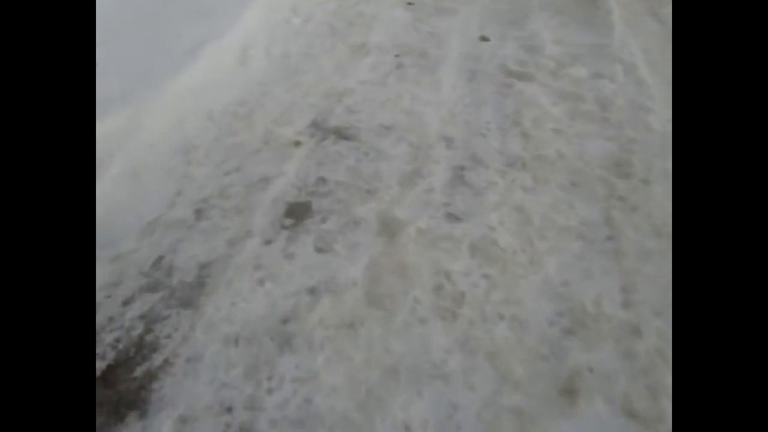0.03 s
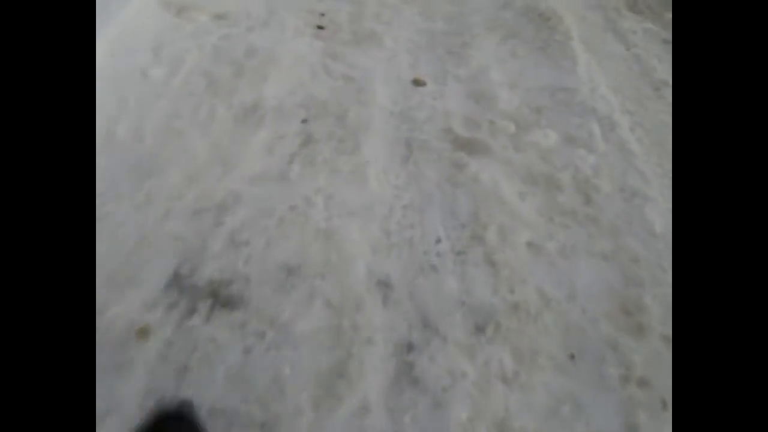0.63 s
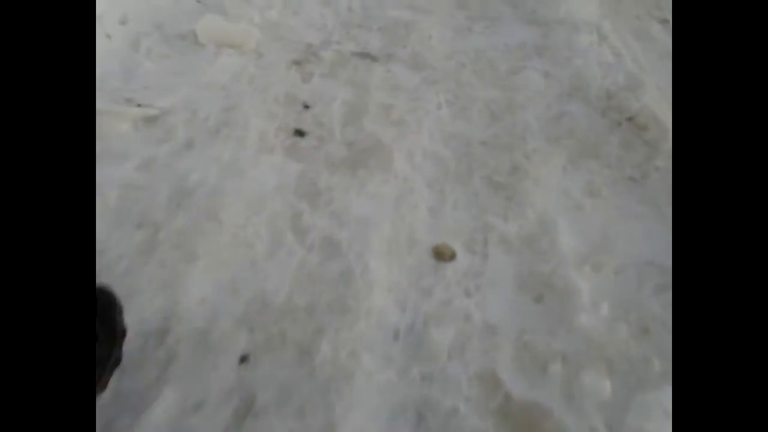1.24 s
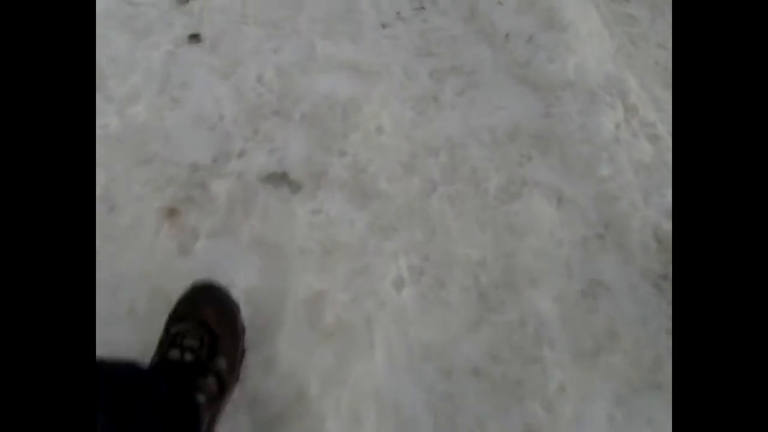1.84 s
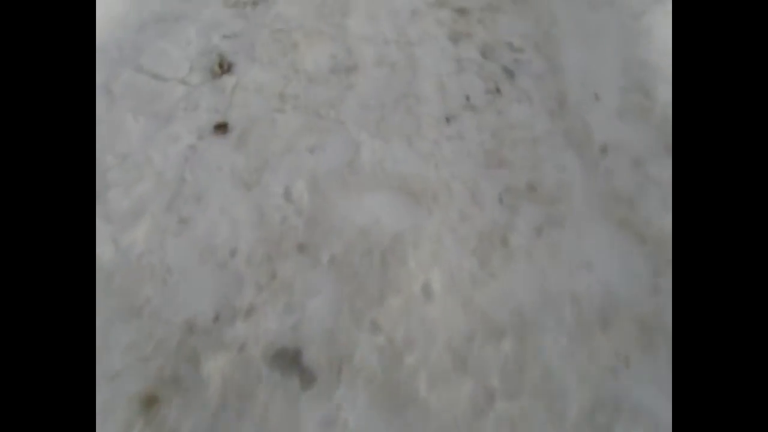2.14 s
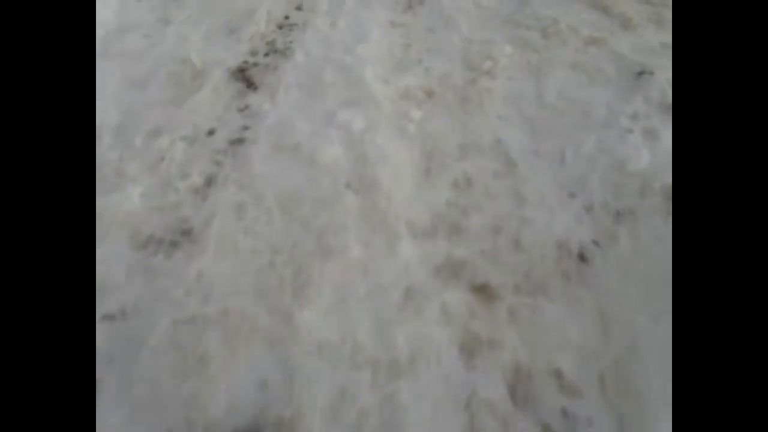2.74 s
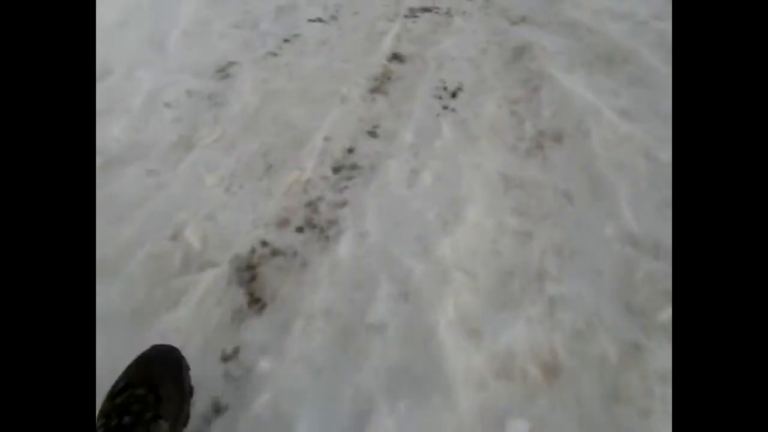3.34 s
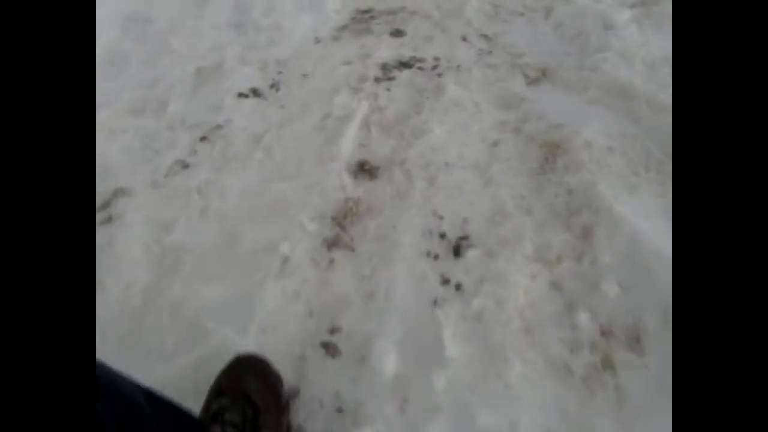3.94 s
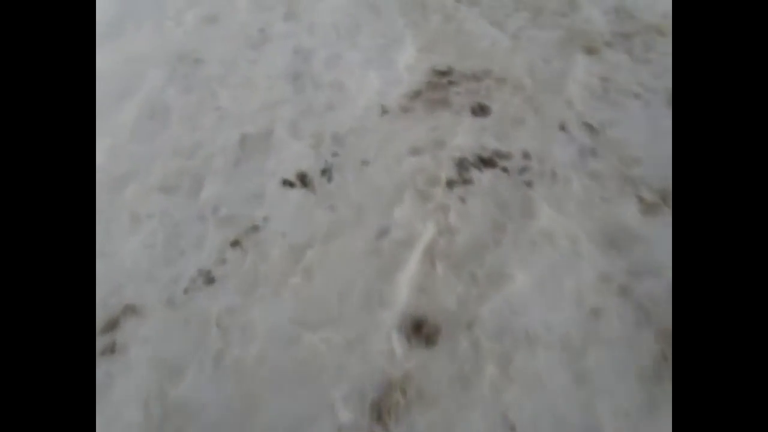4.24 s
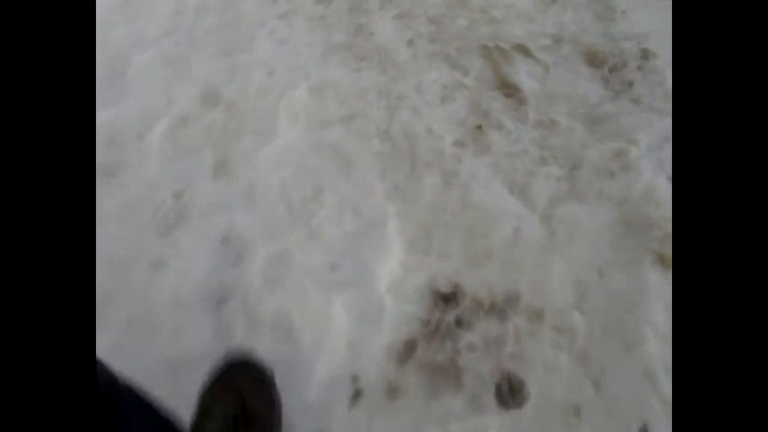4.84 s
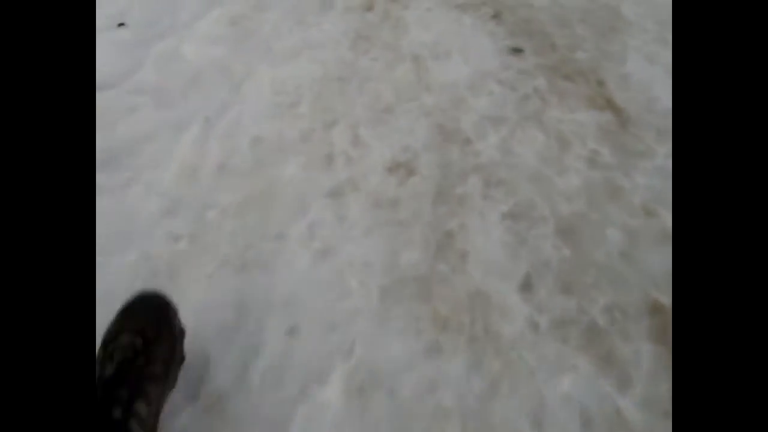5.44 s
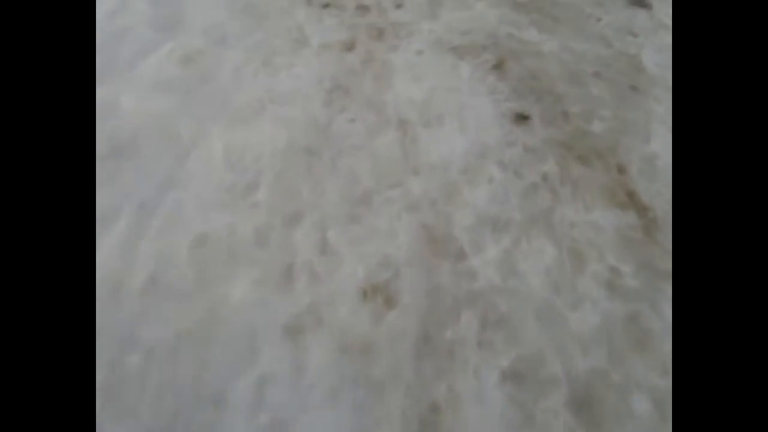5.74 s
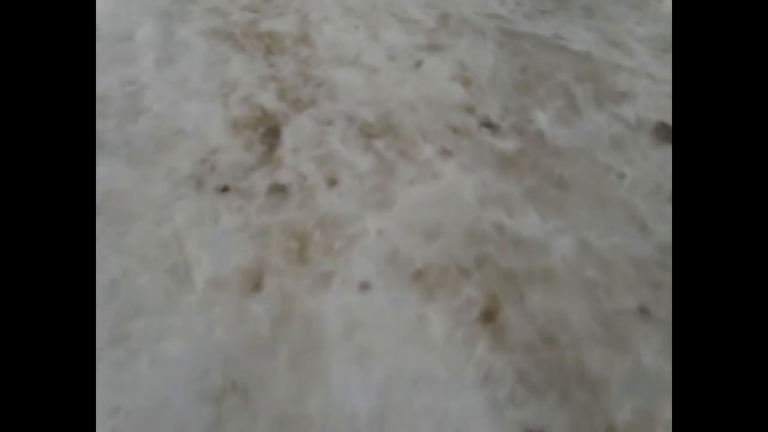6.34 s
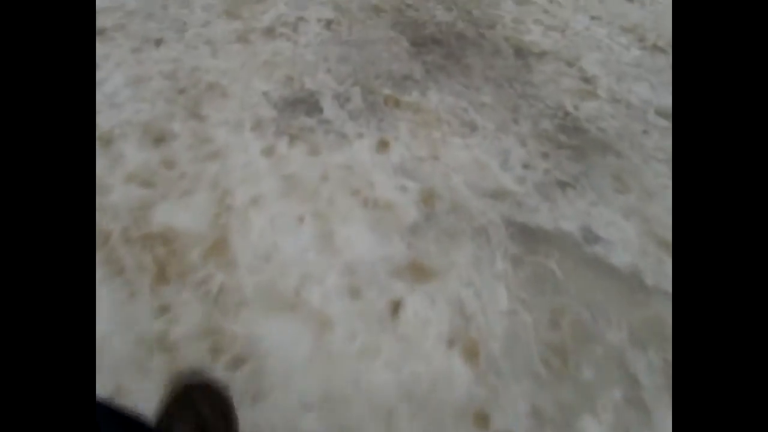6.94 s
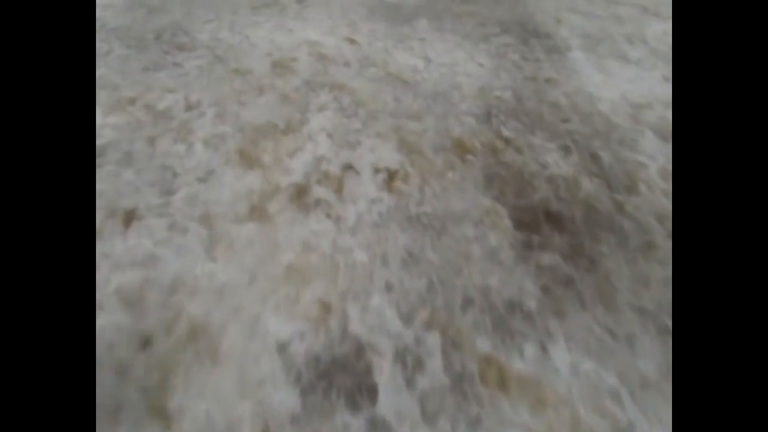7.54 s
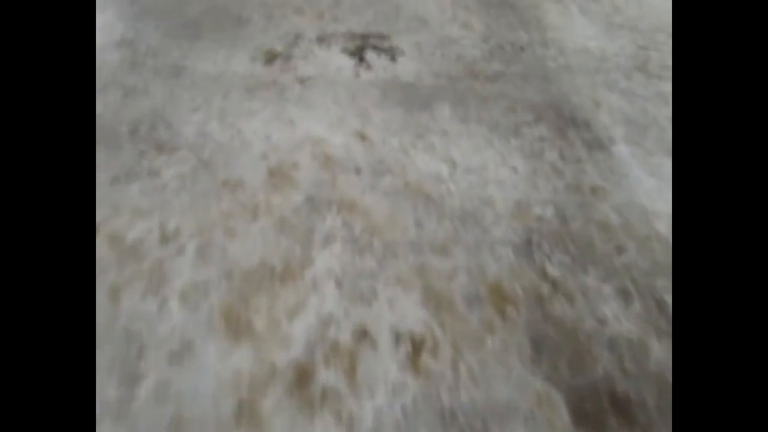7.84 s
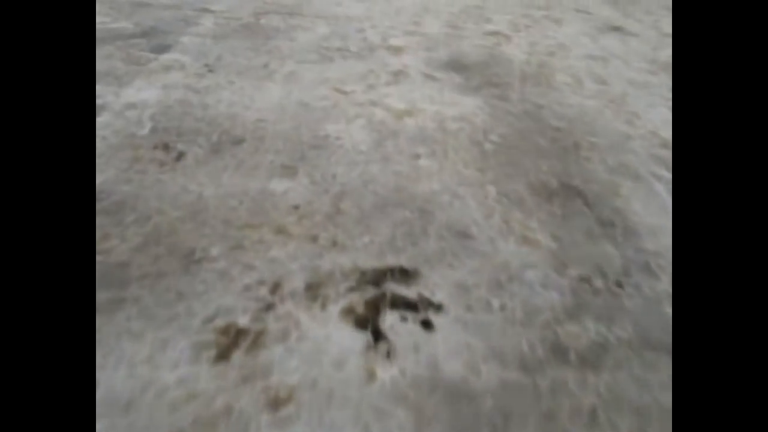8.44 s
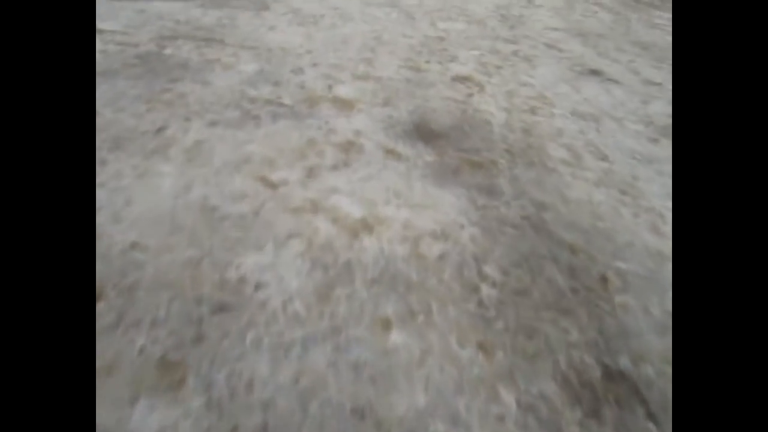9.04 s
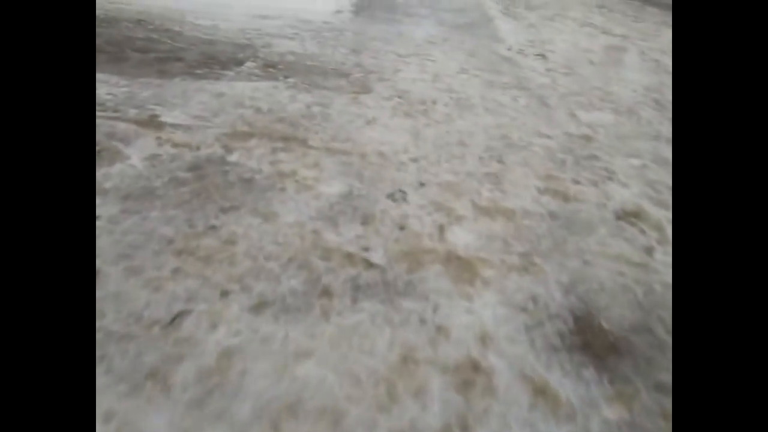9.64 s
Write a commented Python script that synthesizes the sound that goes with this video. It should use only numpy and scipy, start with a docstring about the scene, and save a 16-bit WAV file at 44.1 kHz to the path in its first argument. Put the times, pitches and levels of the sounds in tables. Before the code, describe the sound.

Boots crunch over crusted ice and packed snow at about two steps a second, heard close from a microphone the walker carries. Each step is a dense burst of tiny fractures with a bright fizz of crystals, loose ticks and single sharp cracks. Soles scuff between steps, and one slides with a brief, ringing scrape at 4.5 seconds. From about 5 seconds, wind buffets the microphone in uneven puffs, strongest around 6 seconds and again just before 8. After about 7 seconds the steps become lighter and sparser in texture, as on harder ice, with one loud crack at 8.5 seconds and a thin, high crackle. A few soft, low thuds reach the microphone along the way. A faint outdoor hush lies underneath throughout, and one short, raspy, distant squawk sounds at about 9.6 seconds.

```python
"""Boots crunch over crusted ice and packed snow, about two steps a second.
Each step breaks the crust: a dense crunch of tiny fractures, a fizz of crystals, loose ticks and
single sharp cracks. Now and then a sole slides and the ice sings. The walker points a camera down at
the boots; air buffets its two microphone openings (ports), mostly in the second half, and soft, low
thuds reach it. A faint outdoor hush lies below, with one far squawk near the end."""
import sys
import numpy as np
from scipy import signal
from scipy.fft import rfft, irfft, next_fast_len
from scipy.io import wavfile
from scipy.ndimage import uniform_filter1d

SR = 44100
rng = np.random.default_rng(int(sys.argv[2]) if len(sys.argv) > 2 else 0)


def digitize_waveform(pressure):
    """Quantize a signal to 16-bit integers and store it at the path in sys.argv[1].

    Rows of a 2-D input are taken as channels; values are limited to [-1, 1].
    """
    field = np.atleast_2d(pressure).T
    bounded = np.clip(field, -1, 1)
    quanta = np.round(bounded * 32767).astype(np.int16)
    wavfile.write(sys.argv[1], SR, quanta)


N = 426888

# A boot takes the weight. Each row: start in seconds, hold in seconds, crunch in dB,
# ice hardness in dB (more is brighter), crystal fizz in dB.
FOOTFALLS = [(0.267, 0.026, -25.5, 1.5, -33), (0.828, 0.05, -27.5, 1.5, -41.5),
             (1.368, 0.038, -27.5, -1, -34), (1.878, 0.069, -36, 23, -40), (2.403, 0.049, -30.5, 5, -34.5),
             (2.933, 0.027, -28, 0.5, -35), (3.385, 0.095, -26.5, 3, -37), (3.849, 0.14, -28.5, 9.5, -36.5),
             (4.442, 0.094, -32, 4.5, -38), (5.026, 0.054, -31.5, 2, -35.5), (5.343, 0.27, -33, 1, -50.5),
             (6.052, 0.028, -28.5, 5, -29.5), (6.606, 0.021, -30.5, -4, -49.5),
             (7.069, 0.041, -41, 9.5, -43.5), (7.63, 0.075, -38, 2, -48), (8.146, 0.031, -33.5, 3, -42.5),
             (8.626, 0.013, -41.5, 16, -48), (9.178, 0.035, -43, 40, -50)]
# The sole rolls off or drags. Each row: middle in seconds, half length in seconds, crunch in dB,
# ice hardness in dB, crystal fizz in dB.
SCUFFS = [(0.211, 0.038, -46, 19, -53.5), (0.783, 0.075, -42.5, 34, -61.5), (1.125, 0.093, -32, 5, -52),
          (1.773, 0.03, -43, 25, -56), (2.094, 0.095, -50.5, 16, -49.5), (2.302, 0.069, -38, 11.5, -56.5),
          (2.508, 0.014, -33, 4, -42.5), (2.872, 0.032, -37, 17, -47.5), (3.05, 0.08, -44.5, 16, -42.5),
          (3.31, 0.12, -38, 5, -46.5), (3.972, 0.026, -47, -1, -48), (4.1, 0.067, -47.5, 9, -46.5),
          (4.328, 0.041, -37, -5.5, -49.5), (4.399, 0.0081, -22, 7.5, -29.5), (4.956, 0.12, -43, 9, -56.5),
          (5.2, 0.12, -41.5, -11, -50.5), (5.652, 0.022, -39, 8.5, -47), (5.933, 0.22, -44, 14, -47),
          (6.369, 0.007, -29.5, 2, -43.5), (6.488, 0.0083, -42.5, 0, -57), (7.185, 0.012, -32, -1, -50.5),
          (7.53, 0.024, -42, 24, -52), (8.714, 0.021, -49, 28, -54)]
# Snow rustles under the standing boot. Each row: time in seconds, crunch in dB, crystal fizz in dB.
RUSTLE = [(0, -49, -57), (.52, -60, -67.5), (0.798, -50, -58), (1.6, -52.5, -54.5), (2.7, -43.5, -56.5),
          (4.7, -48, -59), (6.1, -52, -56), (6.9, -49, -65), (8.902, -62.5, -55), (9.68, -44, -62)]
# The tone of the crunch and of the fizz. Each row: frequency in Hz, level in dB.
CRUNCH_COLOUR = [(120, -75.5), (200, -15), (400, -9.5), (520, -5), (750, 2.5), (1000, -0.5), (1400, -5.5),
                 (1700, -3), (2300, -7.5), (3200, -11.5), (3900, -25.5), (6000, -16), (12000, -100)]
FIZZ_COLOUR = [(2000, -21), (3300, -1.5), (4100, -4.5), (5300, 3), (6500, 1), (8300, -1), (10000, -6.5),
               (12000, -12.5), (14000, -30), (16000, -80)]
# Single cracks of the crust. Each row: time in seconds, level in dB, pitch in Hz,
# width of the ring in octaves (3 at most is used), bright snap in dB.
CRACKS = [(0.2426, -28, 990, 1.8, -32), (0.2734, -23, 990, 0.79, -58), (0.3179, -15.5, 1000, 0.95, -32.5),
          (0.3415, -24, 1060, 1.15, -43), (0.3913, -29.5, 990, 0.97, -49), (0.3976, -13, 1120, 0.92, -35),
          (0.5596, -38, 1710, 0.74, -49.5), (0.6266, -21, 1280, 1.13, -49.5),
          (0.6411, -21, 1093, 1.16, -47), (0.6477, -27.5, 1110, 1.24, -59), (0.708, -29.5, 1380, 1.4, -48),
          (0.778, -27, 2140, 2.5, -47), (0.7929, -31, 1110, 2.9, -38), (0.8453, -19, 1120, 1.6, -31),
          (0.857, -17, 1720, 0.84, -28.5), (0.8772, -21, 1050, 1.12, -66), (0.9503, -35.0, 910, 1, -63),
          (0.9868, -32, 1030, 1.5, -65), (0.996, -24.5, 1200, 0.73, -57), (1.0777, -16, 1170, 1.03, -37),
          (1.1104, -24.5, 1150, 0.87, -49), (1.1286, -27, 1430, 0.61, -52), (1.172, -23.5, 1390, 0.66, -73),
          (1.1846, -25, 1550, 0.75, -56), (1.2083, -20.5, 1630, 0.92, -52), (1.2254, -24, 1610, 1.1, -47),
          (1.2547, -28.5, 1260, 2.2, -43), (1.3106, -24, 1260, 2.2, -40), (1.555, -33.5, 1000, 1.5, -40),
          (1.607, -30.5, 1350, 1.8, -42), (1.7071, -31, 1430, 2.1, -43), (1.7276, -32, 1310, 2.1, -43),
          (1.7552, -38, 1480, 3.8, -42.5), (1.8803, -28, 940, 1.25, -53), (2.0937, -24.5, 1320, 1.06, -26),
          (2.1375, -32.5, 940, 2.2, -42), (2.1856, -23.5, 1130, 1.04, -40.5), (2.2618, -30, 1190, 1.4, -49),
          (2.2959, -23, 1250, 1.2, -41), (2.3173, -18.5, 1170, 1.17, -36.5), (2.3368, -22, 1350, 1.1, -40),
          (2.3539, -26.5, 1490, 0.84, -39), (2.405, -23.5, 1030, 0.91, -29), (2.4156, -19.5, 840, 2.7, -30),
          (2.4416, -21, 780, 0.8, -44), (2.4599, -25.5, 840, 2.2, -36), (2.4705, -16.5, 1790, 1.7, -40),
          (2.5615, -19.5, 846, 0.84, -37), (2.6404, -21.5, 1140, 1.24, -47), (2.7149, -22.5, 970, 1.2, -48),
          (2.7884, -31, 1270, 2.6, -57), (2.8018, -30.5, 1095, 2.4, -38.5), (2.8465, -28.5, 1080, 1.5, -48),
          (2.857, -25, 1430, 2.3, -40.5), (3.0355, -22.5, 970, 1.43, -32.5), (3.0478, -25, 1080, 2.6, -56),
          (3.1935, -26, 1080, 1.9, -40), (3.2592, -21, 1140, 1.6, -38), (3.2945, -18.5, 1120, 1.36, -35),
          (3.3669, -17.5, 1040, 1.6, -29), (3.4032, -15.5, 750, 0.49, -42), (3.4195, -18, 920, 0.87, -40),
          (3.4551, -25, 1000, 1.7, -45), (3.5159, -18, 1130, 1.5, -38), (3.5348, -29, 1580, 0.92, -55),
          (3.5501, -14, 1050, 0.99, -42), (3.5876, -29, 1020, 0.62, -64), (3.6067, -19.5, 1060, 1.13, -62),
          (3.667, -34.5, 1015, 0.95, -62.5), (3.6998, -27, 1170, 1.6, -66), (3.7232, -21, 1020, 1.13, -55),
          (3.74, -25, 1000, 0.67, -60), (3.758, -25, 1250, 1.4, -65), (3.784, -32, 1540, 1.3, -63),
          (3.808, -21.5, 1430, 1.5, -58), (3.8164, -25, 1810, 1.4, -44), (3.839, -19.5, 1220, 1.9, -56),
          (3.86, -13.5, 2010, 0.78, -59), (3.8668, -19, 1930, 0.83, -27.5), (3.926, -18, 1040, 1.03, -39),
          (3.9386, -22, 1290, 1.03, -53), (3.9966, -23, 1440, 0.86, -33), (4.0674, -30, 1080, 0.7, -58),
          (4.091, -22, 820, 0.74, -44.5), (4.193, -21.5, 920, 1.17, -39.5), (4.23, -29, 1030, 1.4, -44.5),
          (4.2633, -22.5, 1120, 1.04, -45), (4.267, -16, 1050, 0.98, -28.5), (4.304, -20, 1030, 1.2, -46),
          (4.316, -17.5, 1270, 0.74, -43), (4.36, -22, 1210, 0.84, -46), (4.3934, -16, 1530, 0.65, -47),
          (4.4501, -19.5, 1470, 1.1, -37), (4.7978, -23, 870, 1, -52), (4.9275, -32, 1160, 1.9, -45),
          (4.9373, -28.5, 1200, 2.2, -40.5), (5.022, -25.5, 900, 1.17, -37),
          (5.0307, -24.5, 985, 1.5, -30.5), (5.0367, -21.5, 980, 1, -31), (5.0689, -19.0, 800, 0.78, -51),
          (5.0813, -23, 980, 1.2, -58), (5.193, -23.5, 910, 1.36, -42), (5.2518, -33.5, 1046, 1.27, -39),
          (5.3097, -24.5, 1090, 0.97, -39), (5.3623, -23, 1230, 0.91, -39.5), (5.3961, -29, 1020, 1.5, -45),
          (5.4114, -24.5, 840, 0.85, -41), (5.437, -20.5, 1030, 1.55, -35), (5.536, -20.5, 1040, 1.1, -44),
          (5.6437, -25.5, 1030, 2.1, -44), (5.6511, -25.5, 1360, 1.85, -40), (5.75, -30.5, 872, 0.53, -48),
          (5.8745, -23.5, 860, 1, -41), (6.0593, -21, 1250, 0.99, -25), (6.0825, -19, 870, 1.5, -64),
          (6.1104, -19, 860, 1.25, -41), (6.121, -21, 1003, 0.88, -35), (6.1508, -26, 960, 0.94, -39),
          (6.2179, -32, 1000, 0.97, -59), (6.351, -18.5, 974, 1, -42.5), (6.4282, -35.5, 1470, 1, -47),
          (6.4852, -31, 1460, 1.1, -48), (6.5142, -33.5, 1805, 0.66, -54), (6.542, -32, 1288, 1.4, -49),
          (6.633, -22.5, 1716, 1.8, -36.5), (6.7637, -31.5, 1044, 1.3, -53),
          (6.9931, -36.5, 1560, 2.1, -60), (7.033, -33, 1150, 1.14, -39.5), (7.1454, -31, 960, 1.15, -39.5),
          (7.169, -29, 840, 1.92, -42), (7.2017, -29, 1088, 1.24, -51), (7.2168, -29.5, 1120, 0.58, -43),
          (7.2586, -35, 1640, 0.98, -43), (7.3282, -32.5, 1100, 1.4, -40.5),
          (7.4946, -17.5, 1460, 0.73, -31.5), (7.5137, -28, 1160, 1.8, -40.5),
          (7.5748, -34.5, 1584, 1.8, -42), (7.6115, -19, 1400, 1.26, -37), (7.638, -24, 990, 2, -54),
          (7.648, -22.5, 701, 0.72, -56), (7.6937, -22, 1897, 0.83, -37), (7.7388, -32, 1197, 1.33, -63.5),
          (7.8, -29.5, 960, 0.71, -39), (7.8343, -28.5, 1080, 1.56, -43), (7.89, -21.5, 944, 1.7, -61),
          (7.8947, -26, 1180, 1.38, -63), (7.9562, -37.5, 1310, 1.3, -63), (8.0361, -37.5, 1700, 2.3, -51),
          (8.151, -21, 766, 0.8, -46), (8.1944, -27, 1510, 1.6, -55), (8.3714, -34, 987, 0.8, -49),
          (8.5164, -11, 1280, 1.15, -34), (8.5348, -31, 1450, 0.98, -56), (8.543, -39, 1310, 1.3, -57),
          (8.556, -37, 1800, 3.3, -65), (8.572, -40.5, 1996, 3, -59), (8.587, -36, 1720, 3.6, -59),
          (8.6053, -27.5, 1330, 1.8, -37.5), (8.623, -32, 1750, 0.74, -39), (8.635, -27.5, 1730, 0.79, -55),
          (8.6563, -31, 1390, 3.2, -39), (9.0454, -25.5, 1360, 0.59, -49), (9.045, -26.5, 2770, 0.64, -49),
          (9.2079, -26, 2000, 0.92, -41), (9.2245, -30.5, 1904, 0.51, -51), (9.4334, -34, 750, 1.23, -68),
          (9.531, -34.5, 1106, 2.9, -48)]
# Loose grains on the path, few on the bare ice at the end. Each row: time in seconds, tick gain in dB.
LOOSE_GRAINS = [(0.3, 0), (0.5, -18), (0.9, -7.5), (4.7, -5), (6.8, -6.5), (8.2, -3.5), (8.8, -17)]
# The sole slides. Each row: middle in seconds, half length in seconds, pitch in Hz,
# width in octaves, level in dB.
SLIDES = [(4.51, 0.02, 2000, 0.51, -25.5), (4.585, 0.012, 2130, 0.22, -42),
          (5.208, 0.058, 5150, 0.44, -48.5), (5.428, 0.055, 7400, 0.24, -47),
          (5.572, 0.073, 7540, 0.63, -43.5), (6.453, 0.037, 1774, 0.33, -44.5),
          (8.144, 0.0032, 7370, 0.13, -32)]
# Spells of moving air. Each row: start in seconds, hold in seconds, level in dB.
GUSTS = [(0.273, 0.034, -46.5), (2.842, 0.15, -50.5), (4.318, 0.03, -47), (5.199, 0.2, -43),
         (5.763, 0.42, -38.5), (6.499, 0.32, -47), (6.914, 0.24, -57.5), (7.16, 0.23, -46.5),
         (7.396, 0.52, -44), (8.098, 0.25, -43.5), (8.437, 0.099, -44), (8.685, 0.018, -48.5),
         (8.876, 0.046, -45.5), (9.122, .01, -50.5), (9.441, 0.021, -41.5), (9.527, 0.11, -45.5)]
# The strongest swirls of air to hit the ports. Each row: time in seconds, level in dB.
PUFFS = [(5.338, -26.5), (5.571, -33), (5.792, -29), (5.829, -30.5), (5.928, -21.5), (6.019, -22.5),
         (6.085, -22.5), (6.121, -15), (6.337, -36), (6.499, -29), (7.18, -32), (7.606, -29),
         (7.652, -21.5), (7.887, -18), (8.108, -31.5), (8.298, -34), (9.433, -29)]
# The tone of the wind before its speed shifts it. Each row: frequency in Hz, level in dB.
WIND_COLOUR = [(25, -35), (60, -35), (110, -11), (200, 0.5), (330, 5), (520, 5), (750, 2), (1100, -9),
               (2000, -22), (6000, -88)]
# Soft, low thuds and rumbles. Each row: middle in seconds, level in dB, half length in seconds.
LOW_THUDS = [(0.3, -66, 0.02), (1.952, -57, 0.034), (2.065, -55, 0.03), (2.448, -56, 0.027),
             (3.553, -50, 0.0067), (5.852, -61, 0.06), (6.127, -46, 0.01), (8.48, -57, 0.045),
             (8.52, -44, 0.005)]
# The course of the far squawk. Each row: time in seconds, pitch in Hz, level in dB.
SQUAWK = [(9.55, 1260, -75), (9.57, 1310, -51), (9.6, 1375, -48), (9.613, 1260, -47), (9.632, 1390, -43.5),
          (9.648, 1260, -48), (9.665, 1000, -70)]
# The squawk's harmonics (multiples of its pitch). Each entry: level in dB, lowest harmonic first.
SQUAWK_HARMONICS_DB = [0, -1.5, -15, -6, -21]
# The outdoor background. Each row: time in seconds, hush in dB, thin high crackle in dB.
HUSH_LEVELS = [(0, -54, -84), (6.2, -50, -75), (6.8, -56.5, -74.5), (8.3, -54, -66), (8.9, -57, -61.5),
               (9.35, -52.5, -67), (9.68, -49, -76.5)]
# The tone of the hush. Each row: frequency in Hz, level in dB.
HUSH_COLOUR = [(30, -14), (130, -36), (300, -22), (550, -9), (1060, 0), (2200, 3), (3100, -3.5),
               (4100, -11.5), (5500, -8), (8000, -15.5), (11500, -22), (14000, -24), (16000, -64)]
# How alike the hush is left and right. Each row: frequency in Hz, likeness (1 same, -1 or less opposite).
HUSH_LIKENESS = [(100, -0.49), (600, 0.74), (2500, 0.99), (6000, 0.21), (12000, -1.3)]
# The sharpest clicks of the high crackle. Each row: time in seconds, level in dB.
PINPRICKS = [(8.288, -29), (8.359, -27), (8.867, -26)]

LOAD_DB_PER_S, UNLOAD_DB_PER_S = 541, 346   # how fast a footfall rises and dies
BASE_GRAINS_PER_S = 1900   # scaled by the load and by the share of fine crystals
CRACK_LEAD_S, LEAD_DB = 0.004, -12.5   # two small jumps come at most this long before a crack
CRACK_RUN_S, RUN_ON_DB = 0.00418, -17   # three weaker jumps follow it
OVERTONE_RATIO, OVERTONE_DB = 1.69, -15.5   # a second, purer ring of each plate of crust
TICK_DB, TICK_FOLLOWS, TICK_LINGER_S = -41, 0.42, 0.023   # base level; share of the load's swing; fade
GUST_DB_PER_S, GUST_FLUTTER_DB, CALM_DB = 511, 5, -74   # rise and fall; lumpiness; air between gusts
PORT_LAG_S = 2.5e-5   # the boots are a little nearer to the left port


def crunch(crunch_db, hardness_db, fizz_db):
    """The boot's weight breaks the crust into grains of very unequal size, with a fizz of crystals."""
    # Powder breaks in a dense stream, bare ice in fewer, separate grains.
    density = np.clip(from_db(1.2 * (fizz_db - crunch_db + 11)), .3, 1.6)
    density *= from_db(.5 * np.minimum(crunch_db + 34.5, 0))   # a light touch breaks fewer
    clicks = fractures(per_s=BASE_GRAINS_PER_S * density, spread_db=4.5 + 0.0017 * (crunch_db + 16))
    body = from_db(crunch_db + 0.33) * evened(chips(clicks, hardness_db, octaves=1.27), window_s=0.16)
    fizz = from_db(fizz_db - 1.67) * evened(splinters(clicks ** 2, scatter=0.35), window_s=0.1)
    # Loud fizz gets extra top treble; quiet fizz stays duller.
    top_treble = band(fizz, hz=16600, octaves=1.0) * np.clip((fizz_db + 73.0) / 14, 0, 1)
    return at_ports(body) + fizz + top_treble


def tread():
    """Footfalls, scuffs and rustle add up to three curves in dB: crunch, ice hardness and fizz."""
    t = np.arange(0, N / SR, .001)
    times, rustle_db, rustle_fizz_db = np.transpose(RUSTLE)
    # Each contact: weight, crunch in dB, hardness in dB, fizz in dB.
    contacts = [(0.56, np.interp(t, times, rustle_db), 4, np.interp(t, times, rustle_fizz_db))]
    for start, hold, *ice in FOOTFALLS:
        contacts.append((from_db(held(t, start, hold, LOAD_DB_PER_S, UNLOAD_DB_PER_S)), *ice))
    contacts += [(hump(t, middle, half_length), *ice) for middle, half_length, *ice in SCUFFS]
    power = hardness = fizz = 0
    for weight, crunch_db, hardness_db, fizz_db in contacts:
        share = (weight * from_db(crunch_db)) ** 2
        power += share
        hardness += share * hardness_db
        fizz += (weight * from_db(fizz_db)) ** 2
    return in_time(np.transpose([t, 10 * np.log10(power), hardness / power, 10 * np.log10(fizz)]))


def fractures(per_s, spread_db):
    """Tiny breaks click at random moments: many small ones, a few large."""
    sizes = from_db(spread_db * np.minimum(rng.exponential(1, N), 3))
    return (rng.random(N) < per_s / SR) * sizes * rng.choice([-1, 1], N)


def chips(clicks, hardness_db, octaves, count=12):
    """Each break snaps at the pitch of its piece of crust; hard ice favours the small, high pieces."""
    piece_of_click = rng.integers(0, count, N)
    run = signal.windows.hann(int(.002 * SR))
    snaps = np.zeros(N)
    for piece, hz in enumerate(np.geomspace(540, 2700, count)):
        # A break takes a moment to run through its piece, never the same way twice.
        push = np.convolve(clicks * (piece_of_click == piece), run, "same") * rng.standard_normal(N)
        highness = np.clip(np.log2(hz / 1400), -.6, .6)
        snaps += band(push, hz, octaves) * from_db(hardness_db * highness)
    return coloured(snaps, CRUNCH_COLOUR)[0]


def splinters(power, scatter):
    """Every click frees a short, bright spray of crystals; scatter makes left and right differ."""
    envelope = np.sqrt(lingering(power + 1e-18, fade_s=.0005))
    spray = at_ports(envelope * rng.standard_normal(N)) + scatter * envelope * rng.standard_normal((2, N))
    treble = cut(spray, "high", hz=7000, order=1)
    tilt = from_db(3.5 * drift(80))   # the brightness flickers
    spray = treble * tilt + (spray - treble) / tilt
    balance = from_db([[-.7], [.7]])
    return unit_power(coloured(spray, FIZZ_COLOUR)) * np.sqrt(power.mean()) * balance


def cracks(crunch_db, size=1024):
    """A plate of crust gives way: small first jumps, one short ring, then a few weaker jumps."""
    body, snap_power = np.zeros(N + size), np.zeros(N)
    centre, span = size // 2, .006 * SR   # a crack's energy counts as spread over 6 ms
    blow = np.arange(size) == centre
    after_s = np.maximum(np.arange(size) - centre, 0) / SR
    # Faint scatter comes back from the boot and the ground.
    tail = from_db(-17) * np.exp(-after_s / 0.0012) * (1 - np.exp(-after_s / 0.0006))
    jump_gains = from_db(np.repeat([LEAD_DB, RUN_ON_DB], [2, 3]))
    noises = rng.standard_normal((len(CRACKS), size))
    jumps = rng.uniform(.2, 1, (len(CRACKS), 5))
    detunes = rng.uniform(.85, 1.15, len(CRACKS))
    for (at_s, level_db, hz, octaves, snap_db), noise, jump, detune in zip(CRACKS, noises, jumps, detunes):
        at = int(at_s * SR)
        # A lightly touched plate gives way in less time.
        lead_s = CRACK_LEAD_S * np.clip(from_db(crunch_db[at] + 31), 0.25, 1)
        reach_s = np.repeat([-lead_s, CRACK_RUN_S], [2, 3])
        push = blow + noise * tail
        push[centre + (jump * reach_s * SR).astype(int)] += jump_gains
        overtone = band(push, hz * OVERTONE_RATIO * detune, octaves=0.14)
        ring = band(push, hz, octaves) + from_db(OVERTONE_DB) * overtone
        start = at - np.argmax(np.abs(signal.hilbert(band(blow, hz, octaves))))   # peak lands on time
        body[start:start + size] += from_db(level_db) * ring * np.sqrt(span / np.sum(ring ** 2))
        snap_power[start:start + size] += span * from_db(snap_db) ** 2 * push ** 2 / np.sum(push ** 2)
    # Thin crust gives off little bass, and the hollow under it carries little above its ring.
    body = cut(body[:N], "high", hz=420, order=2)
    body = cut(body, "low", hz=3300, order=5)
    snap = cut(splinters(snap_power, scatter=0.74), "low", hz=7800, order=1)   # duller than powder
    return from_db(-0.5) * at_ports(body) + snap


def loose_ticks(crunch_db, hardness_db):
    """Larger grains snap one by one under and just after every load, each with a little spray."""
    load_db = 10 * np.log10(lingering(from_db(crunch_db) ** 2, TICK_LINGER_S))
    tick_db = TICK_DB + TICK_FOLLOWS * (load_db - load_db.mean()) + in_time(LOOSE_GRAINS)[0]
    clicks = evened(fractures(per_s=130, spread_db=4.5), window_s=.07) * from_db(tick_db)
    body = unit_power(chips(clicks, .5 * hardness_db, octaves=1.6, count=9)) * np.std(clicks)
    brittle = clicks * from_db(7 * np.clip(rng.standard_normal(N), -2, 2))
    return at_ports(body) + from_db(-17.5) * splinters(brittle ** 2, scatter=0.36)


def slides():
    """Rapid tiny slips of the sole keep the ice ringing around one pitch."""
    t, singing = np.arange(N) / SR, np.zeros(N)
    for middle, half_length, hz, octaves, level_db in SLIDES:
        ring = unit_power(band(fractures(per_s=660, spread_db=2.5), hz, octaves))
        singing += from_db(level_db) * ring * hump(t, middle, half_length)
    return at_ports(singing)


def body_echo(boots):
    """The sound of the boots bounces faintly off the walker's body."""
    t = np.arange(SR // 25) / SR
    echo = rng.standard_normal((2, len(t))) * np.exp(-t / 0.005) * (t > .0005)
    echo /= np.linalg.norm(echo, axis=1, keepdims=True)
    return from_db(-21) * signal.oaconvolve(boots, echo, axes=1)[:, :N]


def wind():
    """Swirls of air push on one port and pull on the other; faster air is louder and higher."""
    t = np.arange(N) / SR
    power = from_db(CALM_DB) ** 2
    for start, hold, level_db in GUSTS:
        fade_db = np.maximum(held(t, start, hold, GUST_DB_PER_S, GUST_DB_PER_S), -80)
        power += from_db(level_db + fade_db) ** 2
    power *= from_db(GUST_FLUTTER_DB * np.minimum(drift(22.1), 1.8)) ** 2
    for middle, level_db in PUFFS:
        power += from_db(level_db) ** 2 * hump(t, middle, half_length=0.0066)
    speed = from_db(0.14 * (10 * np.log10(power + 1e-5) + 31))
    position = np.cumsum(speed) % N   # running through the noise faster raises its pitch
    noises = coloured(rng.standard_normal((3, N)), WIND_COLOUR)
    swirls = np.array([np.interp(position, np.arange(N), noise) for noise in noises])
    pressure = swirls[0] * np.array([[1.28], [-.78]]) + 0.32 * swirls[1:]
    return np.sqrt(power) * evened(pressure, window_s=0.2)


def low_thuds():
    """Soft, low thuds and rumbles on the camera, from footfalls, wind and handling."""
    t = np.arange(N) / SR
    swell = sum(from_db(db) * hump(t, middle, half_length) for middle, db, half_length in LOW_THUDS)
    return swell * unit_power(band(rng.standard_normal((2, N)), hz=55, octaves=2.7))


def squawk():
    """A short, far call rises and falls; quick wobbles of pitch and level make it raspy."""
    hz, level_db = in_time(SQUAWK)
    phase = 2 * np.pi * np.cumsum(hz * (1 + .007 * drift(400))) / SR + .1 * drift(250)
    tone = sum(from_db(db + 3 * drift(150)) * np.sin(harmonic * phase)
               for harmonic, db in enumerate(SQUAWK_HARMONICS_DB, 1))
    started = np.arange(N) > SQUAWK[0][0] * SR
    return at_ports(unit_power(tone) * from_db(level_db) * started)


def hush():
    """Smooth, faint outdoor noise carries a thin, very high crackle."""
    hush_db, crackle_db = in_time(HUSH_LEVELS)
    alike = np.clip(at_hz(HUSH_LIKENESS, np.arange(N // 2 + 1) * SR / N), -1, 1)
    shared, opposite = irfft(rfft(rng.standard_normal((2, N))) * np.sqrt([1 + alike, 1 - alike]), N)
    air = from_db(hush_db) * unit_power(coloured([shared + opposite, shared - opposite], HUSH_COLOUR))
    clicks = fractures(per_s=2700, spread_db=6.5)
    crackle = from_db(crackle_db) * unit_power(band(clicks, hz=9900, octaves=0.73))
    pricks = np.zeros(N)
    for at_s, level_db in PINPRICKS:
        pricks[int(at_s * SR)] = from_db(level_db)
    bright_click_peak = np.abs(band(np.arange(SR) == 0, hz=11380, octaves=0.88)).max()
    crackle += band(pricks, hz=9400, octaves=0.74) / bright_click_peak
    return air + at_ports(crackle)


def at_ports(x):
    """Sound reaches the right port a moment after the left."""
    size = next_fast_len(N + 64)
    delay = np.exp(-2j * np.pi * np.arange(size // 2 + 1) * PORT_LAG_S * SR / size)
    return np.array([x, irfft(rfft(x, size) * delay, size)[:N]])


def from_db(db):
    """Turn decibels into a number to multiply by."""
    return 10 ** (np.asarray(db) / 20)


def unit_power(x):
    """Scale a sound so that its average power is 1."""
    return x / np.sqrt(np.mean(x ** 2) + 1e-20)


def evened(x, window_s):
    """Even out slow changes of level but keep the fine grain."""
    width = int(window_s * SR)
    power = np.mean(np.atleast_2d(x) ** 2, axis=0)
    power = uniform_filter1d(uniform_filter1d(power, width), width)
    return x / np.sqrt(np.abs(power) + 1e-3 * power.mean())


def held(t, start, hold, rise_db_per_s, fall_db_per_s):
    """A level in dB that rises to 0 at the start, stays there, then falls."""
    return -rise_db_per_s * np.maximum(start - t, 0) - fall_db_per_s * np.maximum(t - start - hold, 0)


def hump(t, middle, half_length):
    """A smooth, bell-shaped rise and fall."""
    return np.exp(-.5 * ((t - middle) / half_length) ** 2)


def lingering(power, fade_s):
    """Let each burst die away gradually."""
    kept = np.exp(-1 / (fade_s * SR))
    return signal.lfilter([1 - kept], [1, -kept], power)


def drift(hz):
    """A smooth random wobble of about 1 either way; more Hz makes it quicker."""
    kept = np.exp(-40 * np.pi * hz / SR)
    slow = signal.lfilter([1], [1, -2 * kept, kept * kept], rng.standard_normal(N // 20 + 2002))[2000:]
    return np.interp(np.arange(N) / 20, np.arange(len(slow)), unit_power(slow))


def in_time(rows):
    """Join a table's timed rows with straight lines, giving one curve for each value column."""
    times, *columns = np.transpose(rows)
    return [np.interp(np.arange(N) / SR, times, column) for column in columns]


def at_hz(rows, hz):
    """Read a table between its frequencies, with octaves evenly spaced."""
    row_hz, values = np.transpose(rows)
    return np.interp(np.log(hz + 1e-3), np.log(row_hz), values)


def coloured(x, colour, size=4096):
    """Give a sound the tone of a colour table."""
    cepstrum = irfft(np.log(from_db(at_hz(colour, np.arange(size // 2 + 1) * SR / size))))
    # Folding this onto its first half makes the filter ring only after a click, never before.
    cepstrum[1:size // 2] *= 2
    cepstrum[size // 2 + 1:] = 0
    response = irfft(np.exp(rfft(cepstrum)))[:size // 2]
    return signal.oaconvolve(np.atleast_2d(x), response[None] / np.linalg.norm(response), axes=1)[:, :N]


def band(x, hz, octaves):
    """Keep the sound around one pitch; a narrower band rings longer."""
    half = 2 ** (min(octaves, 3) / 2)
    return cut(x + 1e-18, "band", hz=[hz / half, min(hz * half, .45 * SR)], order=2)


def cut(x, keep, hz, order):
    """Keep the "low", "high" or "band" part of a sound; a higher order cuts the rest more steeply."""
    return signal.sosfilt(signal.butter(order, hz, keep, fs=SR, output="sos"), x)


def scene():
    """Boots on open ground, with wind, low thuds, the hush and a far squawk."""
    crunch_db, hardness_db, fizz_db = tread()
    boots = crunch(crunch_db, hardness_db, fizz_db) + loose_ticks(crunch_db, hardness_db)
    boots += cracks(crunch_db) + slides()
    return boots + body_echo(boots) + wind() + low_thuds() + hush() + squawk()


def record(dry):
    """A slightly lopsided microphone adds a thump to hard cracks; peaks and the top treble are cut."""
    thump = from_db(-28.0) * band(dry ** 2, hz=160, octaves=3)
    treble_cut = signal.ellip(10, .1, 80, 15800, fs=SR, output="sos")   # steep, above 15800 Hz
    return signal.sosfilt(treble_cut, np.clip(dry + thump, -1, 1))


dry = scene()
out = record(dry)
digitize_waveform(out)
```